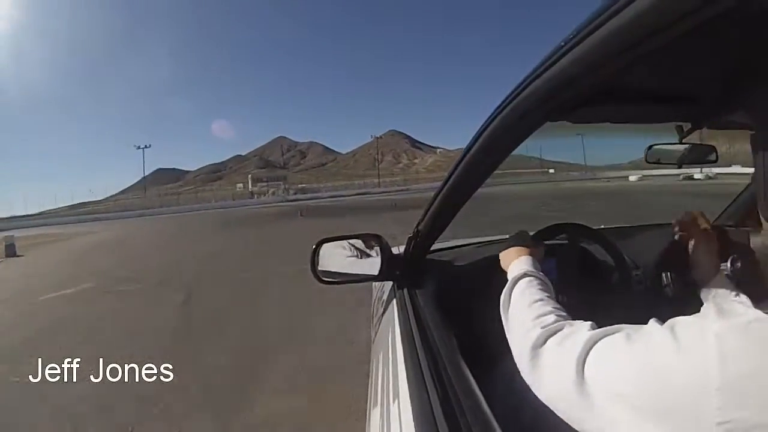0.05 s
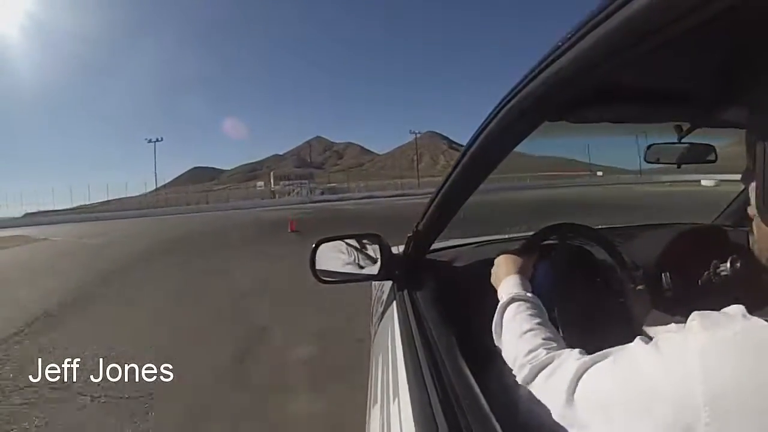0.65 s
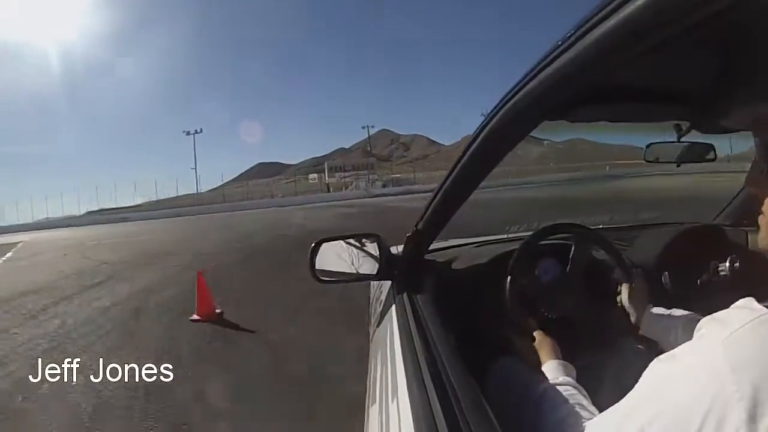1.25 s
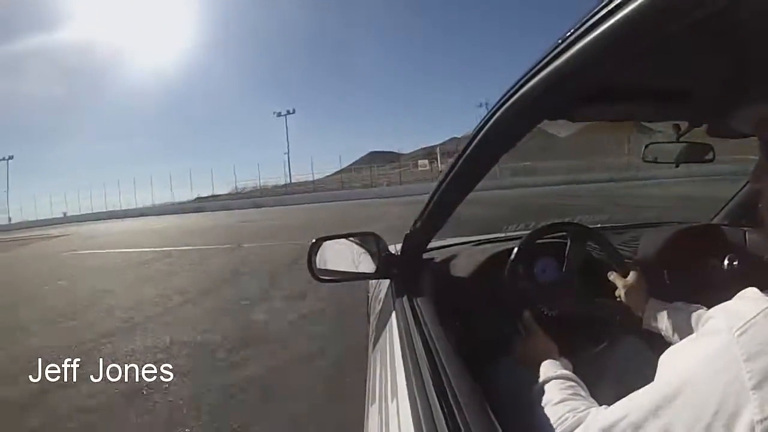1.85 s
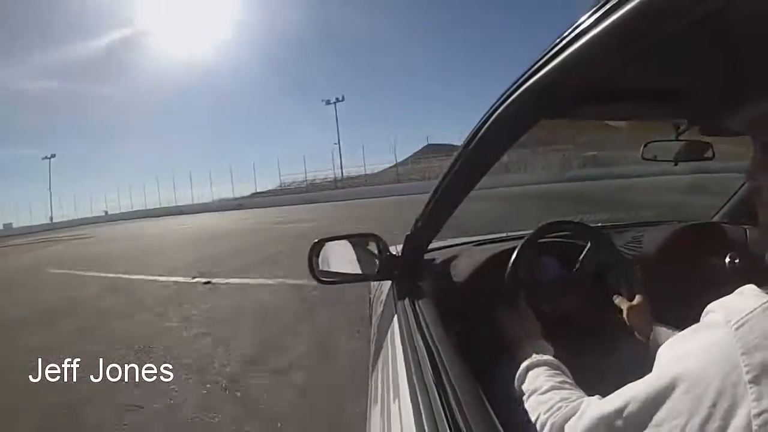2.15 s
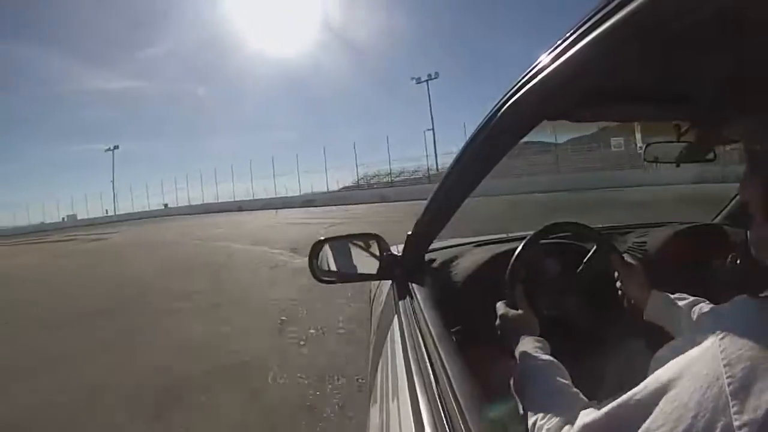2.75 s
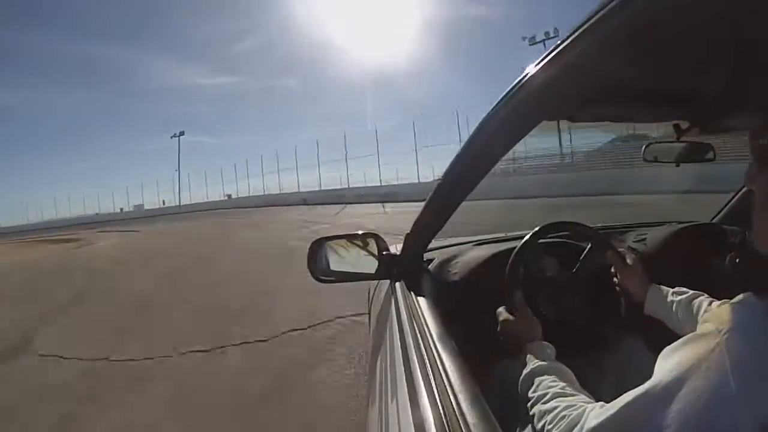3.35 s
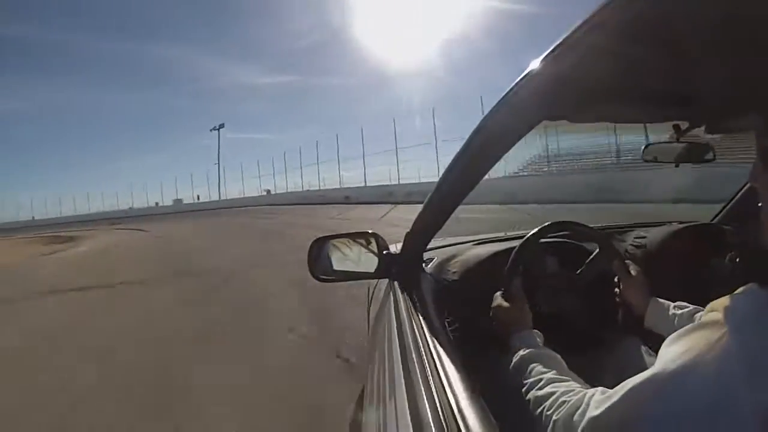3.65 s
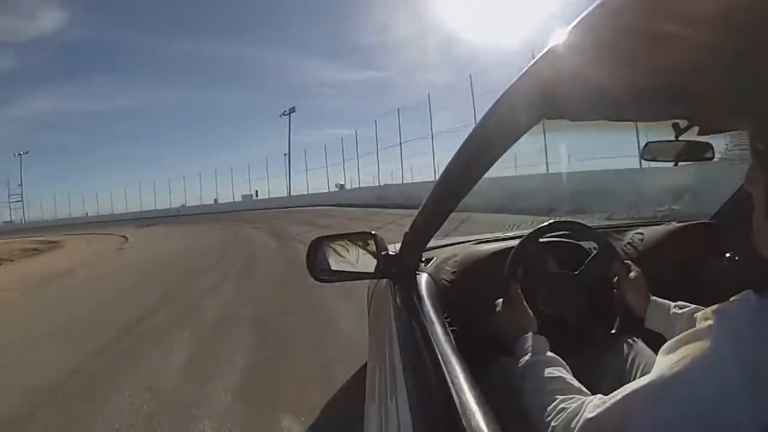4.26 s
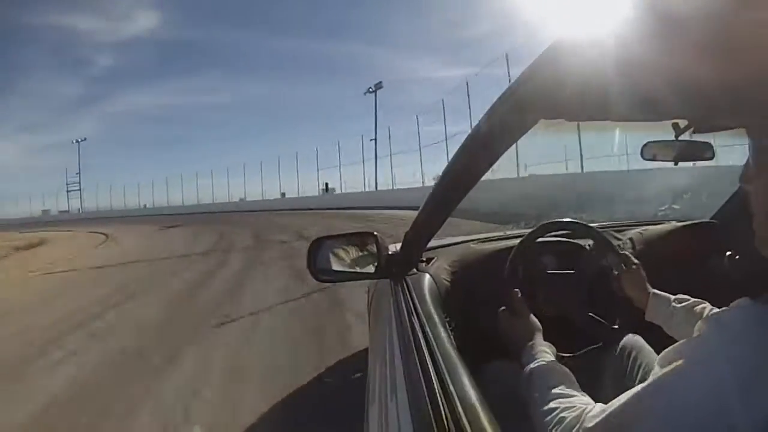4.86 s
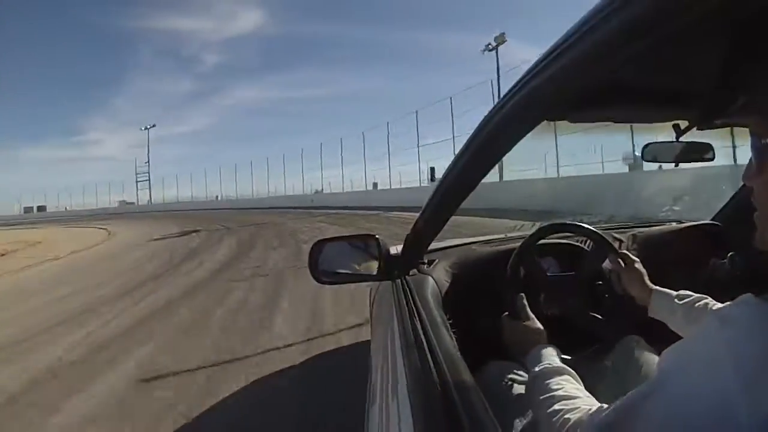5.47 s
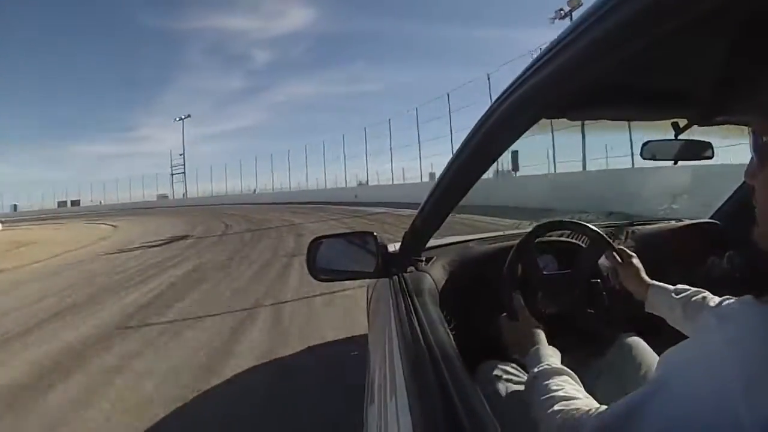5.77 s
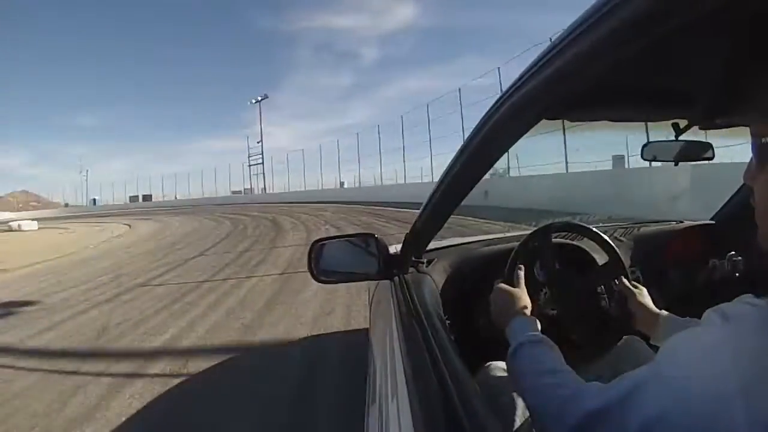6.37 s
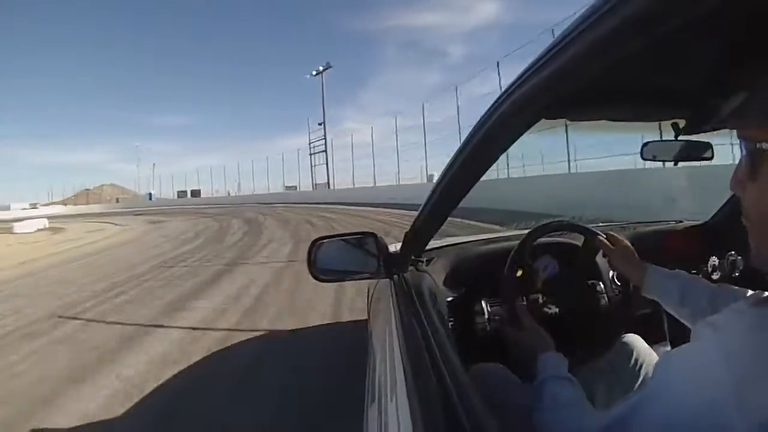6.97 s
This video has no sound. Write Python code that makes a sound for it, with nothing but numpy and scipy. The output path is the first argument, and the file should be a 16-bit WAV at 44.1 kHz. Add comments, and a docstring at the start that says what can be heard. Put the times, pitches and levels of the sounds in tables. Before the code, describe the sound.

Low, gusty wind buffets a cased microphone outside a moving car's door throughout. From the start a rasping hiss tears across the case, strongest from about 0.5 to 1.9 seconds, then breaks into sputtering spurts until 3.7. Muffled pops dot the first 2.5 seconds, the loudest near 1.5, and return between 3.3 and 4.3. From about 3.2 the wind grows heavier and air at the open window sets up a deep, unsteady throb, strongest around 4.2 to 4.6. More hiss spurts cluster between 5 and 5.7 seconds, with two pops, and a few follow near the end. Underneath, a four-cylinder engine drones, climbing slowly in pitch through one gear and growing louder. It takes on a harder bark from 5.7 until the throttle eases around 7. Sliding tyres scrub softly on asphalt all along, with a faint squeal near 5.3 that rises again at 7 seconds.

```python
"""Car sliding through a long bend.

Heard at a cased camera outside the driver's door. The slipstream buffets the case, pops at
its port and tears across it in a rasping hiss that breaks into spurts; the cabin throbs behind
the open window. Underneath, tyres scrub on asphalt and a four-cylinder pulls up through one gear."""
import sys
import numpy as np
from scipy import signal
from scipy.fft import rfft, irfft
from scipy.io import wavfile
from scipy.ndimage import uniform_filter1d

SR = 44100
rng = np.random.default_rng(int(sys.argv[2]) if len(sys.argv) > 2 else 0)


def digitize_waveform(pressure):
    """Quantize a signal to 16-bit integers and store it at the path in sys.argv[1].

    Rows of a 2-D input are taken as channels; values are limited to [-1, 1].
    """
    field = np.atleast_2d(pressure).T
    bounded = np.clip(field, -1, 1)
    quanta = np.round(bounded * 32767).astype(np.int16)
    wavfile.write(sys.argv[1], SR, quanta)


N = 318402
T = np.arange(N) / SR
FREQS = np.maximum(np.arange(N // 2 + 1) * SR / N, 1)

# cabin air throb: time_s, pitch_hz, level_db
CABIN_THROB = [(0, 72, -32), (2.8, 76, -29), (3.25, 78, -18.5), (3.95, 81, -19), (4.2, 82, -14.5),
               (4.6, 84, -14.5), (4.92, 85, -22), (5.33, 84, -15.5), (5.65, 85, -23), (6.0, 86, -20),
               (7.22, 83, -24)]


def undb(db):
    """Decibels to gain."""
    return 10 ** (np.asarray(db) / 20)


def unit(x):
    """Scale to rms 1."""
    return x / np.sqrt(np.mean(x ** 2))


def curves(table):
    """Value columns of a time table, interpolated per sample."""
    time_s, *columns = np.transpose(table)
    return [np.interp(T, time_s, column) for column in columns]


def ramp(start_s, length_s):
    """Linear rise from 0 to 1."""
    return np.clip((T - start_s) / length_s, 0, 1)


def colour(outline, hz, skirt_db_per_octave=30):
    """Level in dB of a (freq_hz, level_db) outline, falling off beyond its ends."""
    freq_hz, level_db = np.transpose(outline)
    octaves_outside = np.abs(np.log2(hz / np.clip(hz, freq_hz[0], freq_hz[-1])))
    return np.interp(np.log(hz), np.log(freq_hz), level_db) - skirt_db_per_octave * octaves_outside


def resonances(modes, hz):
    """Summed lift in dB of (centre_hz, width_hz, lift_db) modes."""
    return sum(db / (1 + (2 * (hz - centre) / width) ** 2) for centre, width, db in modes)


def noise(spectrum_db):
    """Shaped noise, rms 1."""
    return unit(irfft(rfft(rng.standard_normal(N)) * undb(spectrum_db), N))


def walk(rate_hz):
    """Random drift up to about rate_hz, rms 1."""
    knots = rng.standard_normal(N // 100)
    return unit(np.interp(2 * rate_hz * T, np.arange(len(knots)), knots))


def eddies(outline, hold_s):
    """Turbulence, levelled over spans longer than hold_s."""
    turbulence = noise(colour(outline, FREQS))
    size = max(int(hold_s * SR), 8)
    power = uniform_filter1d(uniform_filter1d(turbulence ** 2, size), size)
    return turbulence / np.sqrt(power + 1e-9)


def engine_load(firing_hz, drone_full_hz=155.9, bark_full_hz=142.3, floored_db=7, lifted_db=-18):
    """Drone and bark levels in dB: both rise with revs to a cap; the bark also follows the throttle."""
    floored = ramp(start_s=5.72, length_s=0.28)
    lifted = ramp(start_s=6.92, length_s=0.11)
    throttle_db = floored_db * floored * (1 - lifted) + lifted_db * lifted
    drone_db = -17.5 + 0.4 * np.minimum(firing_hz - drone_full_hz, 0)
    bark_db = -37.5 + 0.55 * np.minimum(firing_hz - bark_full_hz, 0)
    return drone_db, bark_db + throttle_db


def engine(shimmer_db=3.0, uneven_db=1, crank_db=7.5, rough_db=1.5):
    """The exhaust drones on the firing rate; unequal cylinders add a bark of four-stroke cycle orders."""
    # engine speed: time_s, firing_hz
    revs = [(0, 118), (2.3, 123), (3.5, 136.9), (4.1, 143.3), (4.7, 146.9), (5.3, 149.5), (5.6, 152),
            (6.15, 158.8), (6.5, 161.4), (7.0, 164.5), (7.22, 167)]
    # exhaust drone partials: firing_multiple, level_db
    partials = [(.5, -10.5), (1, -2), (1.5, -21), (2, -23.5), (3, -31), (4, -30.5)]
    # bark spectrum: freq_hz, level_db
    bark_colour = [(350, -6), (490, 0.5), (570, -6.5), (640, 1.5), (800, -9), (980, 1), (1150, 0),
                   (1400, -2.5), (1730, -7.5), (2000, -19.5), (3000, -18), (5000, -40)]
    # cabin and exhaust resonances that swell passing engine tones: centre_hz, width_hz, lift_db
    car_modes = [(330, 14, 8), (730, 36, 8), (1000, 60, 2)]
    firing_hz, = curves(revs)
    drone_db, bark_db = engine_load(firing_hz)
    firing_hz = firing_hz * (1 + 0.001 * walk(10))
    phase = 2 * np.pi * np.cumsum(firing_hz) / SR
    drone = bark = 0
    for multiple, db in partials:
        gain = undb(db + resonances(car_modes, multiple * firing_hz) + shimmer_db * walk(6))
        drone += gain * np.sin(multiple * phase)
    hop = SR // 10
    for order in np.arange(9, 49):
        multiple = order / 4
        hz = multiple * firing_hz[::hop]
        # even orders lock to the crank and stand out
        db = colour(bark_colour, hz) + resonances(car_modes, hz) + crank_db * (order % 2 == 0)
        gain = undb(db + uneven_db * rng.standard_normal(len(hz)))
        bark += np.interp(T, T[::hop], gain) * np.sin(multiple * phase + rng.uniform(0, 2 * np.pi))
    bark = unit(bark) * undb(rough_db * walk(25))  # no two cycles burn alike
    return unit(drone) * undb(drone_db) + bark * undb(bark_db)


def tyres(grain_db=1.5, waver_db=1.0):
    """Sliding tread scrubs on coarse asphalt and rings faintly as it sticks and slips."""
    # scrub envelope: time_s, level_db
    scrub_levels = [(0, -38), (1.4, -33.5), (2.45, -36), (3.2, -29.5), (3.7, -36), (5.35, -31.5),
                    (5.7, -33), (6.1, -31.5), (7.22, -31)]
    # scrub spectrum: freq_hz, level_db
    scrub_colour = [(200, 9.5), (350, -0.5), (550, 3), (800, -1.5), (1100, -6.5), (1400, -1.5),
                    (1650, -8.5), (2050, -17.5), (2500, -11.5), (3400, -12.5), (4150, -26), (4550, -24),
                    (5000, -30.5), (10500, -40), (14000, -50)]
    # squeal envelope: time_s, level_db
    squeal_levels = [(0, -71.5), (3, -50.5), (4.6, -46), (5.33, -39), (5.6, -46), (6.4, -40.5),
                     (6.95, -45.5), (7.08, -34.5), (7.22, -32.5)]
    # tread modes: centre_hz, half_width_hz, level_db
    tread_modes = [(1150, 30, -1.5), (1320, 30, -0.5), (1560, 170, -4.5)]
    scrub_db, = curves(scrub_levels)
    squeal_db, = curves(squeal_levels)
    scrub = noise(colour(scrub_colour, FREQS)) * undb(scrub_db + grain_db * walk(65))
    rings = sum(undb(db) / (1 + ((FREQS - hz) / half_hz) ** 2) for hz, half_hz, db in tread_modes)
    squeal = noise(20 * np.log10(rings)) * undb(squeal_db + waver_db * walk(15))
    return scrub + squeal


def throb(wander=0.021, swell_db=2):
    """Air passing the open window drives the cabin on one unsteady low note."""
    pitch_hz, level_db = curves(CABIN_THROB)
    phase = 2 * np.pi * np.cumsum(pitch_hz * (1 + wander * walk(14.7))) / SR
    return np.sqrt(2) * np.sin(phase) * undb(level_db + swell_db * walk(11))


def slipstream():
    """Relative levels in dB of large, middling and small eddies; all follow the airflow and its gusts."""
    # airflow strength: time_s, level_db
    airflow = [(0, -23.5), (.62, -21), (.78, -26.5), (1.03, -26.5), (1.15, -22.5), (2.75, -21.5),
               (3.25, -16), (3.95, -19.5), (4.3, -13), (6.4, -17), (7.22, -18)]
    # gusts and lulls: centre_s, length_s, shove_lift_db, boom_lift_db
    gusts = [(0.138, 0.11, 8, 6), (0.233, 0.14, -9, -8), (1.35, 0.19, 5, 4), (1.53, 0.15, 2, 6.5),
             (1.83, 0.22, 7, 4.5), (2.174, 0.09, 9, 8), (2.27, 0.076, 10, 5), (2.95, 0.075, 1, 4),
             (3.213, 0.18, 9, 1), (3.557, .14, 2.5, 3), (3.703, 0.094, 4, 8), (4.564, .1, 4, 3.5),
             (5.1, 0.13, -2, 4.5), (5.35, 0.2, 3, 3.5), (5.53, 0.042, -5, 6.5), (6.197, 0.43, 8.5, 1.5),
             (6.554, 0.2, 6, 2.5), (6.874, 0.17, 5.5, 1)]
    flow_db, = curves(airflow)
    shove_lift_db = boom_lift_db = 0
    for centre_s, length_s, shove_db, boom_db in gusts:
        swell = np.exp(-(2 * (T - centre_s) / length_s) ** 2)
        shove_lift_db += shove_db * swell
        boom_lift_db += boom_db * swell
    large_db = 0.25 * flow_db + shove_lift_db
    middle_db = flow_db + boom_lift_db
    small_db = 0.67 * flow_db + 0.73 * boom_lift_db
    return large_db, middle_db, small_db


def buffeting(shove_db=-19.0, boom_db=1, flutter_db=-13, gusty_db=2, lumpy_db=1.5, duck_knee_db=-18):
    """Large eddies shove the case, middling ones boom at the open window, small ones flutter."""
    # eddy spectra, large to small: freq_hz, level_db
    shove_colour = [(10, -20.5), (18, -6), (30, 5), (45, -6.5), (60, -10), (90, -31.5)]
    boom_colour = [(35, -33.5), (58, -14.5), (72, 9), (84, 5.5), (97, -1.5), (120, 4), (145, -5.5),
                   (190, -18)]
    flutter_colour = [(90, -27), (140, 2), (175, 1), (215, -1.5), (260, -10.5), (320, -13), (420, -20),
                      (600, -26)]
    large_db, middle_db, small_db = slipstream()
    _, throb_db = curves(CABIN_THROB)
    shove = eddies(shove_colour, hold_s=0.1) * undb(large_db + shove_db + lumpy_db * walk(7.7))
    # the low wind boom gets quieter while the cabin throb is loud
    duck = 1 / np.sqrt(1 + undb(throb_db - duck_knee_db) ** 2)
    boom = eddies(boom_colour, hold_s=0.057) * undb(middle_db + boom_db) * duck
    flutter = eddies(flutter_colour, hold_s=0.078) * undb(small_db + flutter_db + gusty_db * walk(40))
    return shove + boom + flutter


def crossflow(release_s=0.05, spurt_trim_db=-2.5):
    """Amplitude of the air crossing the case: sustained rushes and short spurts, summed in power."""
    # rushes: start_s, end_s, level_db, rise_s, drift_db_per_s
    rushes = [(0, 0.118, -23, 0.0033, 11), (0.149, 0.506, -31, 0.056, 25.5), (0.49, 1.562, -22.5, 0.13, 2),
              (1.595, 1.869, -18, 0.13, -25.5), (1.918, 2.119, -25.5, 0.03, 12),
              (2.528, 2.905, -29.5, 0.087, 4), (2.975, 3.226, -28.5, .015, -5)]
    # spurts: peak_s, level_db, length_s
    spurts = [(2.009, -18, 0.011), (2.181, -17.5, 0.012), (2.226, -23.5, 0.022), (2.27, -29.5, 0.028),
              (2.291, -25, .012), (2.35, -30.5, 0.02), (2.392, -29.5, 0.021), (2.448, -30.5, 0.039),
              (2.531, -20.5, 0.022), (2.607, -22, 0.034), (2.693, -23.5, 0.032), (2.769, -20, 0.028),
              (2.821, -21.5, 0.019), (2.94, -17, 0.011), (2.984, -24.5, 0.024), (3.138, -19.5, 0.01),
              (3.219, -17, 0.0031), (3.343, -28.5, 0.013), (3.432, -31, 0.016), (3.488, -22, 0.013),
              (3.525, -22.5, 0.014), (3.586, -30, 0.042), (3.677, -34.5, 0.011), (4.591, -31.5, 0.012),
              (4.705, -37, 0.011), (4.765, -34.5, .022), (4.837, -25, 0.0065), (5.029, -18, 0.023),
              (5.092, -32, 0.034), (5.262, -24.5, 0.02), (5.33, -24, 0.029), (5.387, -32.5, 0.018),
              (5.499, -19, 0.016), (5.548, -17.5, 0.038), (5.589, -19.5, 0.027), (5.627, -23, 0.014),
              (5.656, -32, 0.012), (5.691, -29.5, 0.022), (6.392, -35.5, 0.019), (6.58, -32.5, 0.019),
              (6.796, -35.5, 0.12), (6.832, -25.5, 0.02), (7.21, -17.5, 0.0095)]
    power = np.zeros(N)
    for start_s, end_s, level_db, rise_s, drift_db_per_s in rushes:
        gate = ramp(start_s, rise_s) * (1 - ramp(end_s, release_s))
        drift_db = drift_db_per_s * np.clip(T - start_s, 0, end_s - start_s)
        power += gate * undb(level_db + drift_db) ** 2
    for peak_s, level_db, length_s in spurts:
        near = np.abs(T - peak_s) < 2 * length_s
        age = (T[near] - peak_s) / length_s
        width = np.where(age < 0, 0.47, 0.49)  # attack, release
        power[near] += undb(level_db + spurt_trim_db) ** 2 * np.exp(-(age / width) ** 2)
    return np.sqrt(power)


def hiss(full_flow_db=-22, grit_db=2.0, treble_hz=4500, brighten=0.53):
    """Air tears across the case and rings its cavities; a faster stream is louder and brighter."""
    # hiss spectrum: freq_hz, level_db
    rasp_colour = [(400, -11.5), (1000, -18.5), (1450, -15), (1850, -11), (2050, -6), (2350, 2),
                   (2900, -3.5), (3400, 4), (3900, -5.5), (4200, -15), (5300, -22), (8800, -33),
                   (10800, -32.5), (11800, -41), (15000, -57)]
    # case modes: centre_hz, width_hz, lift_db
    case_modes = [(2680, 70, 4), (3880, 100, 3), (4420, 120, 4), (4720, 200, -3), (5020, 200, 3),
                  (5660, 190, 9), (5830, 100, -5), (6100, 200, 5), (6650, 200, 7.5), (8000, 500, 6)]
    envelope = crossflow()
    flow = envelope / undb(full_flow_db)
    sputter_db = 1.17 * np.clip(flow, 0.25, 1) ** -0.78  # a weak stream sputters more
    sputter = undb(sputter_db * walk(70) + grit_db * walk(220))
    air = noise(colour(rasp_colour, FREQS) + resonances(case_modes, FREQS))
    treble = signal.sosfiltfilt(signal.butter(2, treble_hz, "high", fs=SR, output="sos"), air)
    return envelope * sputter * (air + treble * (flow ** brighten - 1))


def pops(trim_db=-1, scatter=0.069, muffle_hz=1700, attack_s=0.00065):
    """Each bursting eddy is a pressure spike that briefly rings the port, muffled by the case."""
    # eddy bursts: time_s, level_db
    bursts = [(0.046, -18), (0.107, -16), (0.121, -15), (0.145, -12), (0.156, -12.5), (0.343, -20),
              (0.396, -21), (0.438, -20.5), (0.497, -19), (0.931, -17), (1.036, -24), (1.088, -17),
              (1.187, -24), (1.221, -20), (1.341, -20), (1.447, -18), (1.531, -8.5), (1.653, -18),
              (1.796, -20.5), (1.825, -16.5), (2.029, -20.5), (2.164, -23), (2.259, -15), (2.289, -13.5),
              (2.328, -24), (2.399, -16), (2.437, -18), (3.273, -16), (3.323, -16), (3.476, -13.5),
              (3.535, -19), (3.615, -18.5), (3.7, -17), (3.74, -18.5), (3.825, -18.5), (3.839, -17),
              (3.971, -22), (4.135, -19.5), (4.285, -15), (5.416, -17), (5.564, -15.5)]
    # port modes: pitch_hz, t60_s, level_db
    port_modes = [(80.6, 0.058, 4.5), (243, 0.014, 2), (389, 0.013, -4), (536, 0.013, 3),
                  (784, 0.021, -15.5), (1420, 0.019, -8)]
    track = np.zeros(N + SR)
    t = T[:SR // 10]
    pitch_hz, t60_s, mode_db = np.transpose(port_modes)[:, :, None]
    decay = undb(mode_db - 60 * t / t60_s)
    attack = 1 - np.exp(-t / attack_s)
    for time_s, level_db in bursts:
        detuned_hz = pitch_hz * (1 + scatter * rng.standard_normal(pitch_hz.shape))
        ring = np.sum(decay * np.sin(2 * np.pi * detuned_hz * t), axis=0)
        start = int((time_s + 2 * attack_s) * SR)
        track[start:start + len(t)] += 2 * undb(level_db + trim_db) * ring * attack
    return signal.sosfilt(signal.butter(6, muffle_hz, fs=SR, output="sos"), track[:N])


def scene():
    """All sources at one microphone."""
    return (engine() + tyres() + throb() + buffeting() + hiss() + pops())[None]


def record(dry, ceiling=1.68, top_hz=15200):
    """The camera rounds the peaks and cuts the top."""
    rounded = ceiling * np.tanh(dry / ceiling)
    return signal.sosfilt(signal.ellip(8, 0.2, 70, top_hz, fs=SR, output="sos"), rounded)


dry = scene()
out = record(dry)
digitize_waveform(out)
```